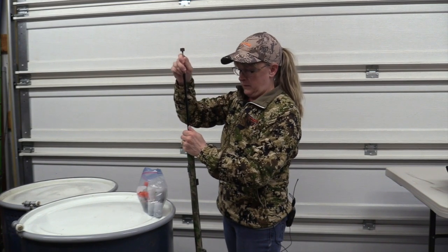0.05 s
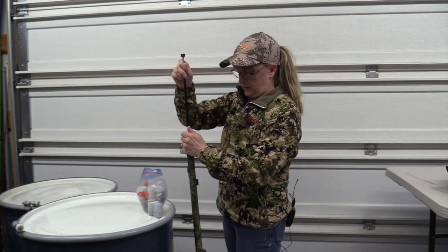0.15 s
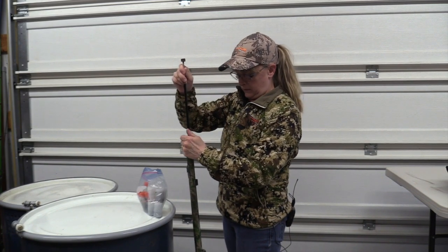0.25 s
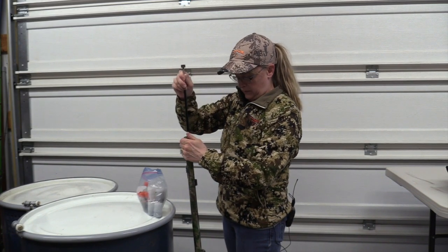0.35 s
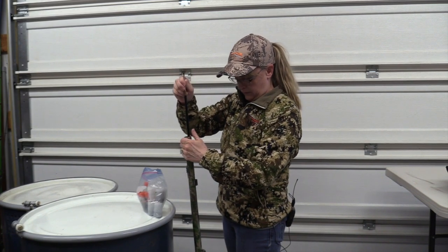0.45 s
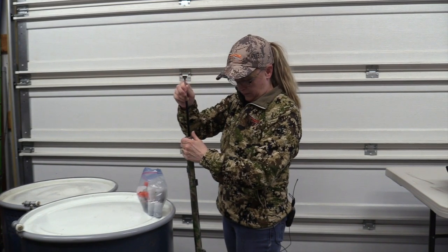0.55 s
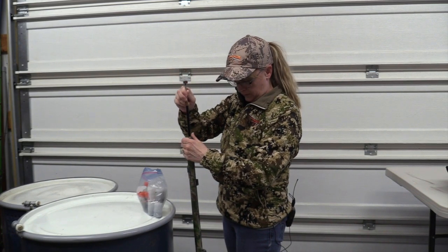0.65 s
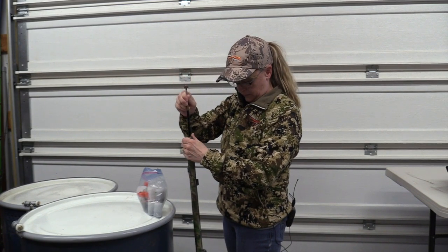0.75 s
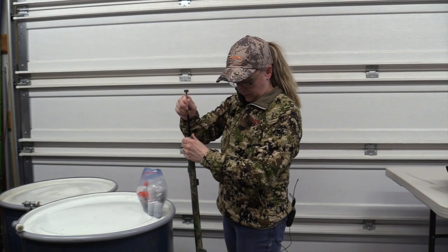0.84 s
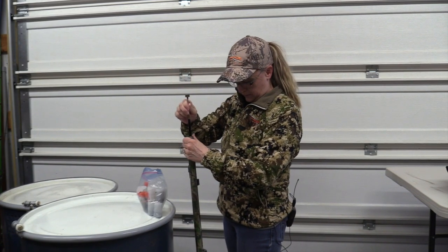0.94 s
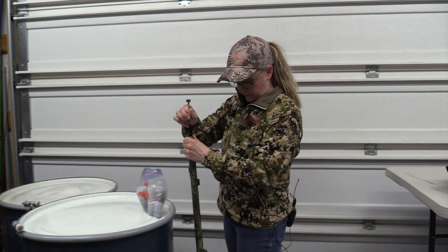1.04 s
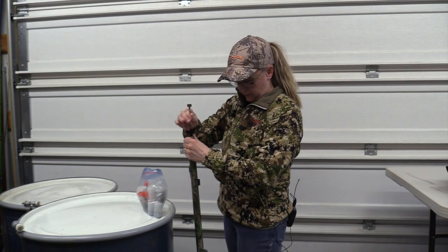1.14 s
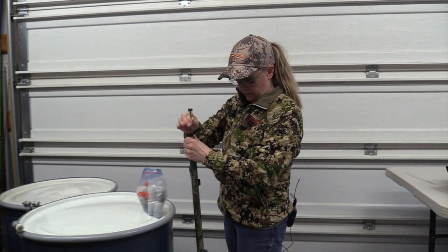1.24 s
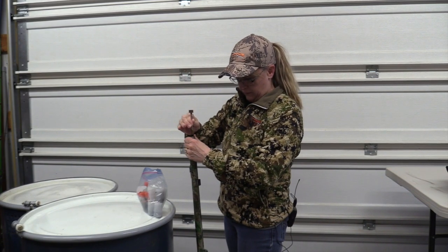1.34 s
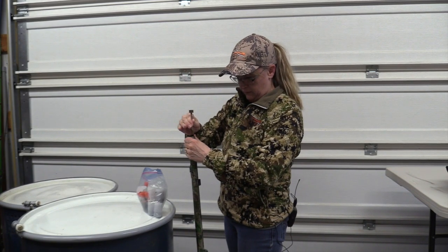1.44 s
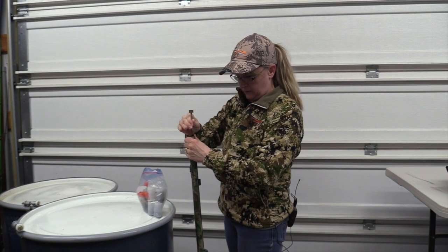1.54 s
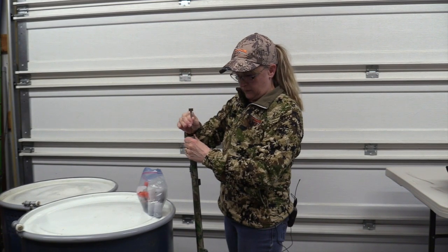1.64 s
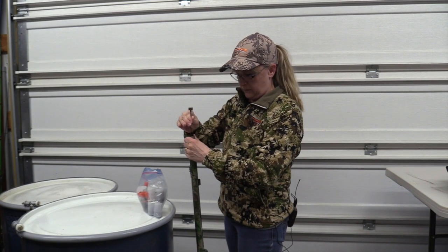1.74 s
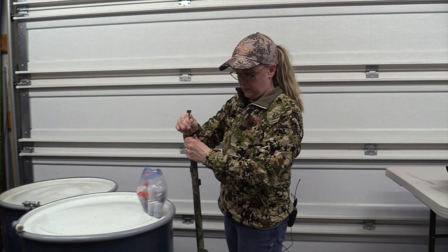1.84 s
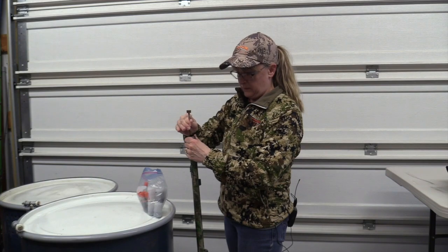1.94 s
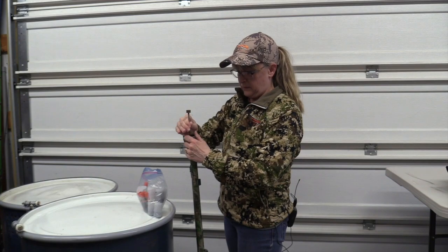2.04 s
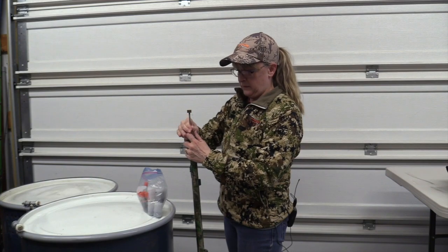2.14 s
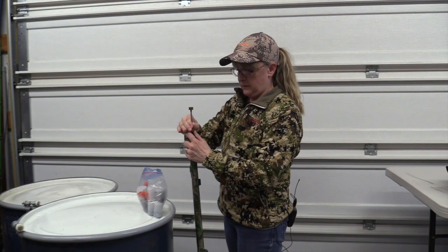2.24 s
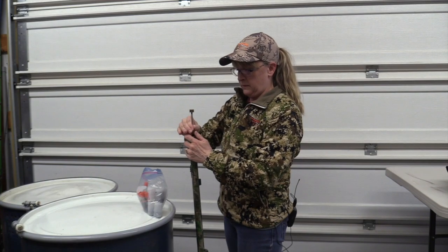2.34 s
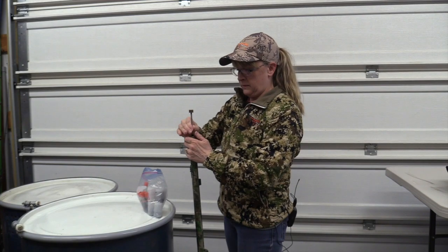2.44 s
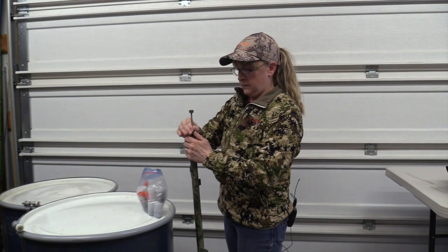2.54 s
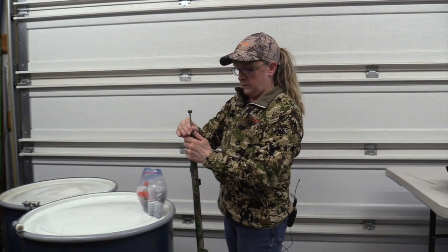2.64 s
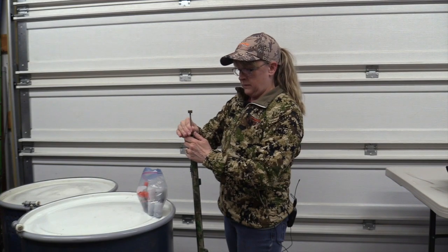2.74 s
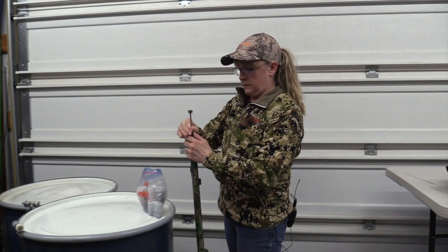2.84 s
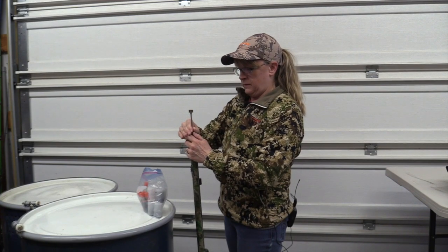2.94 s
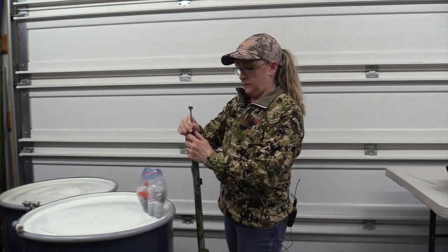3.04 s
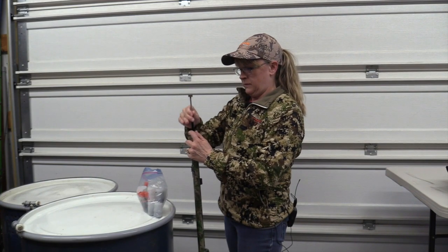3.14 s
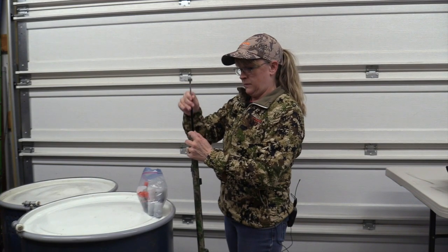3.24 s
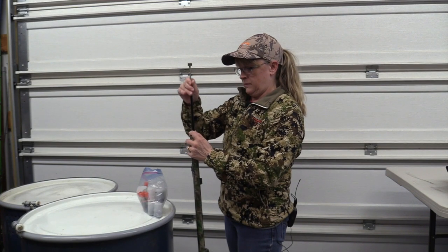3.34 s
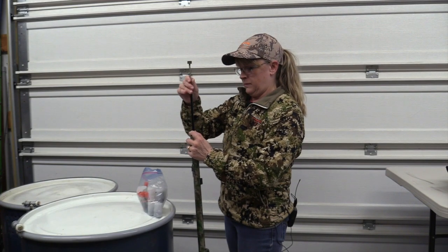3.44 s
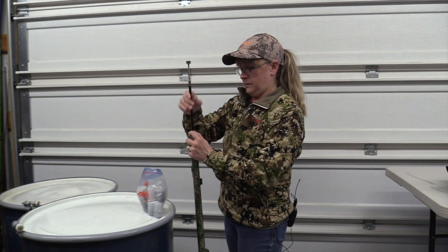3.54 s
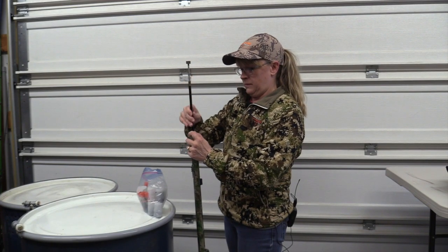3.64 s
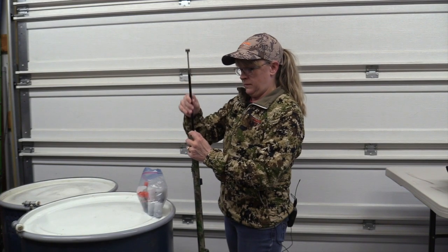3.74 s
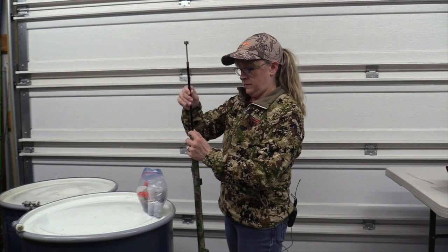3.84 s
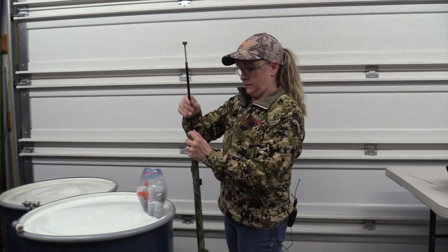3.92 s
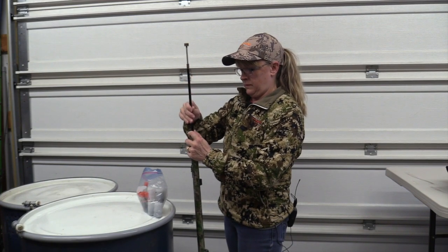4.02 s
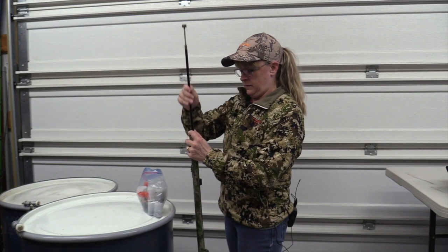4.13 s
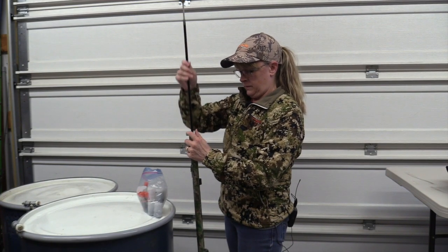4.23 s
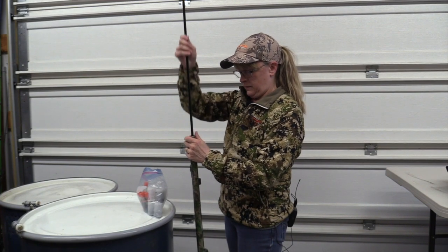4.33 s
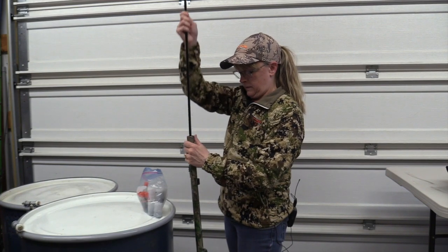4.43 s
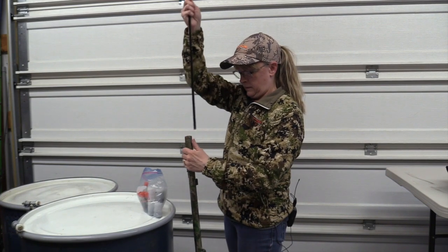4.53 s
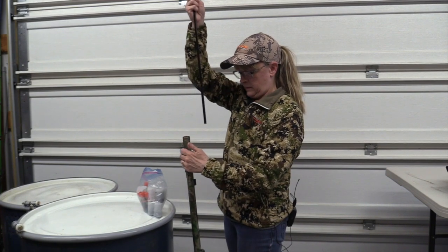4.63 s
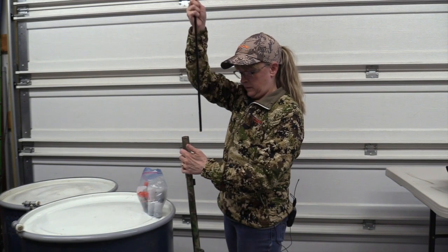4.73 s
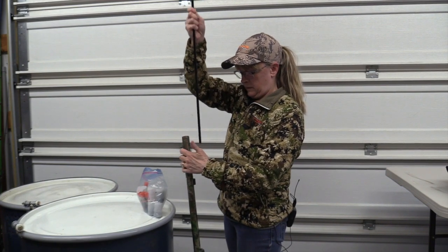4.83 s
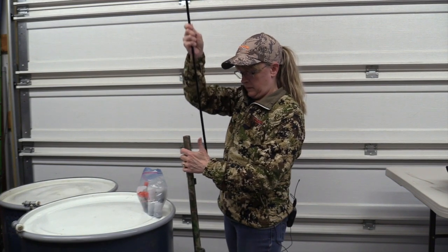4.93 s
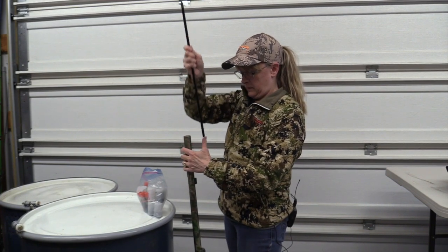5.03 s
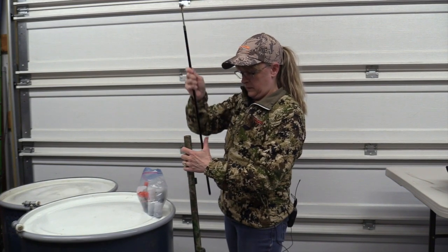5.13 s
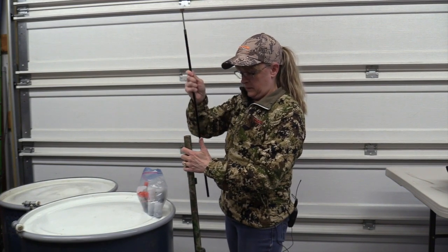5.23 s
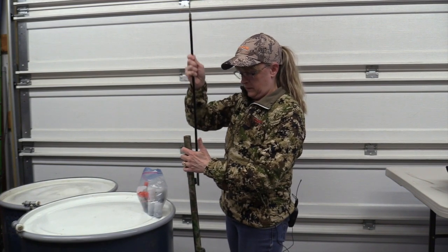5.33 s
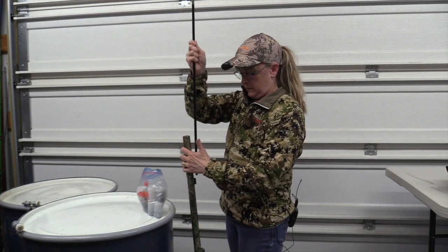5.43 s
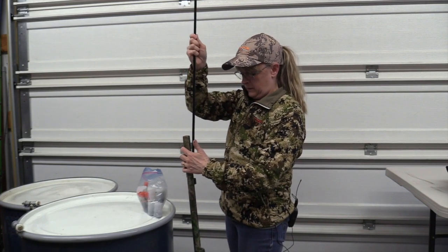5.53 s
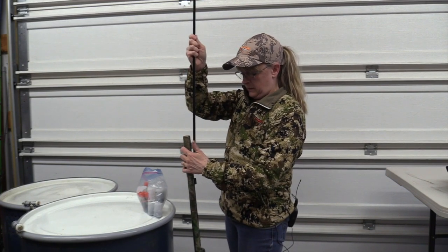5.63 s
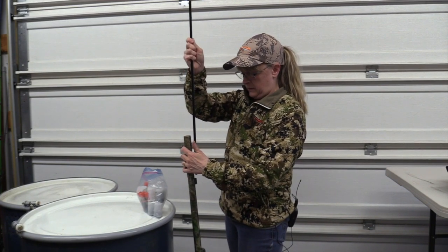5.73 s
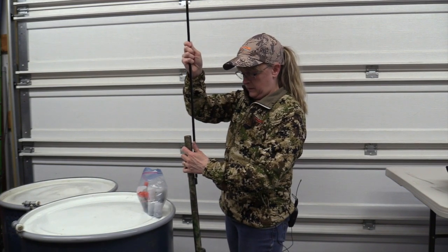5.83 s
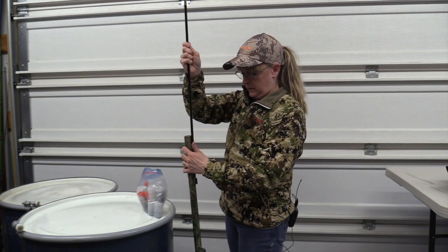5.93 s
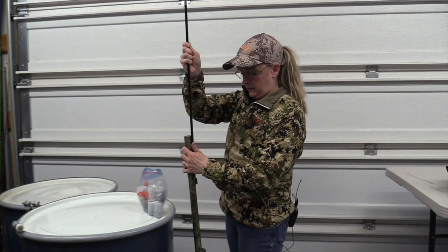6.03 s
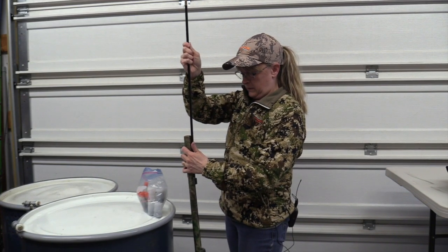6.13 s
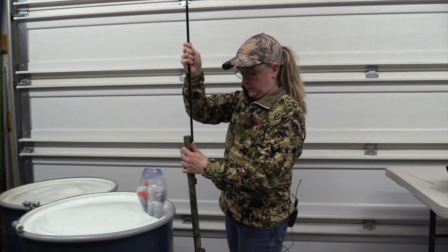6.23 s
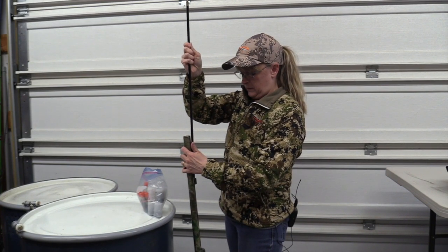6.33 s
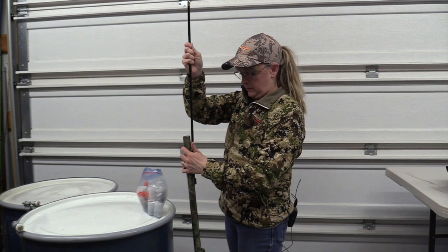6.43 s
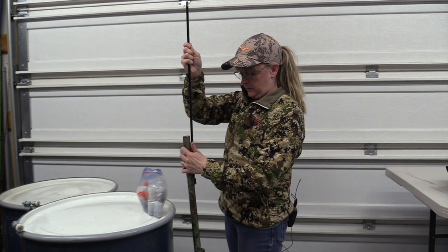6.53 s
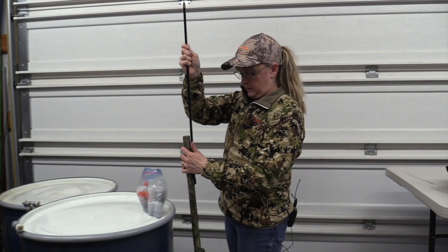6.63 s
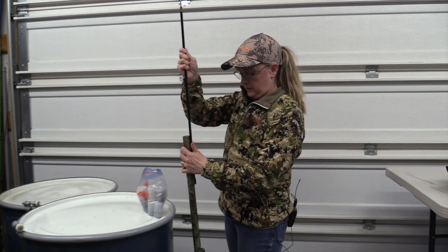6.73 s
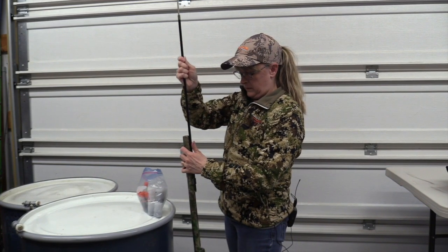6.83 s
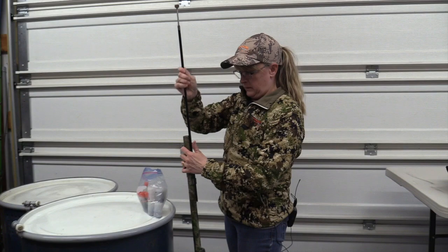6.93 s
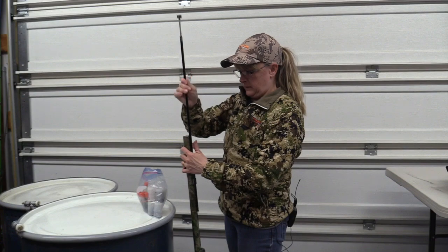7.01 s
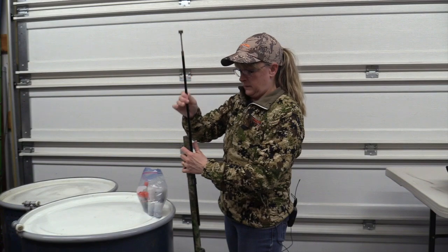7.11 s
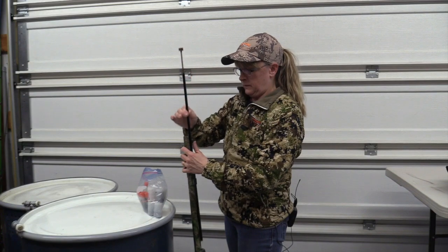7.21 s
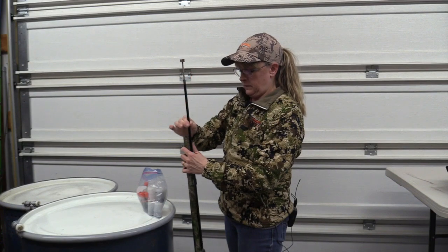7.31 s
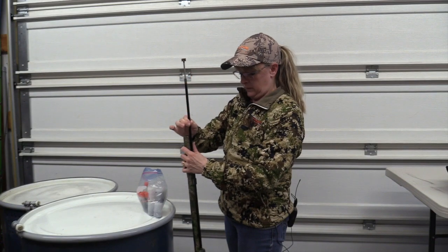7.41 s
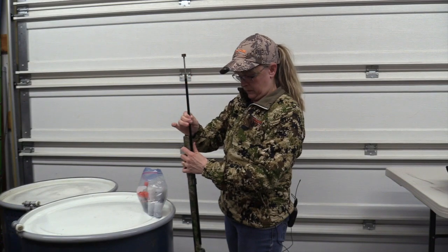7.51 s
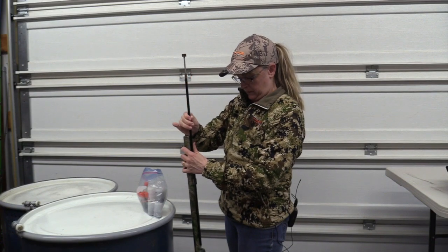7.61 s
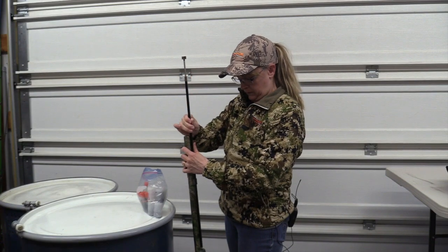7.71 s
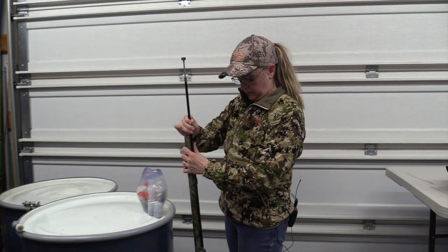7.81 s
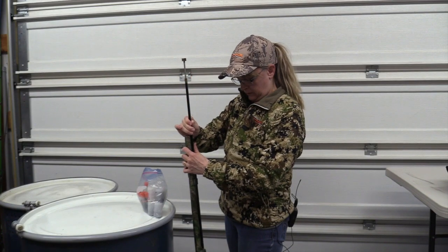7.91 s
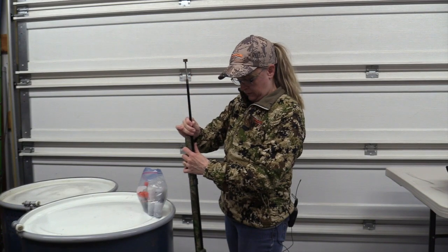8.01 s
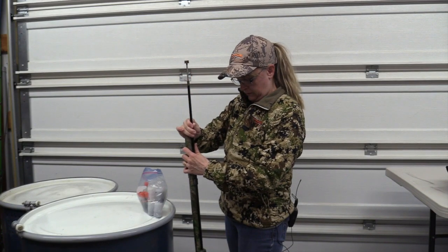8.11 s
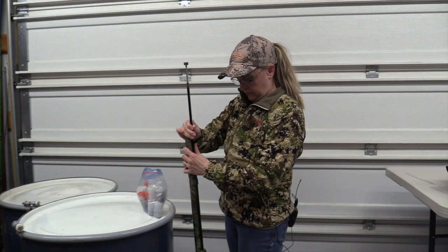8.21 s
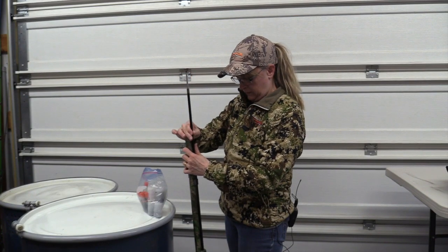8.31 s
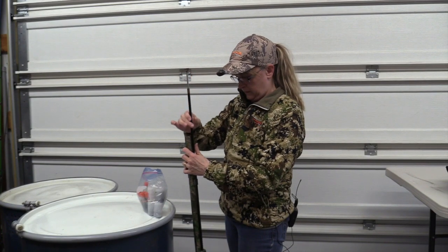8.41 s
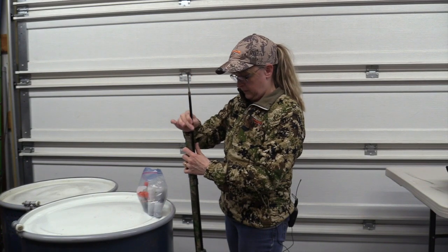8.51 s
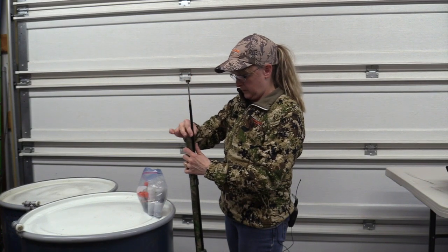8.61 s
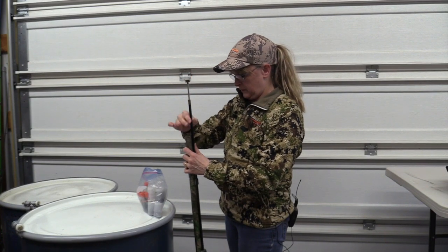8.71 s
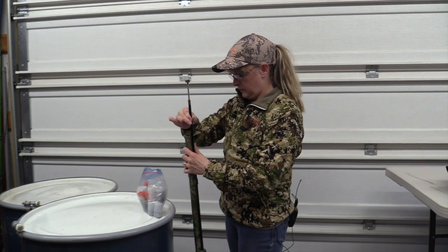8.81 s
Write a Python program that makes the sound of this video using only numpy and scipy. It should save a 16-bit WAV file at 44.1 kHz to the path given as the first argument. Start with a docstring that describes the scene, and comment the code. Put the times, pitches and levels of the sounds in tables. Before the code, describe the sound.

Air hisses with a thin sinking whistle as a rod is pushed down a gun barrel, then stops. Soft knocks follow, then a burst of loud bright metallic clinks and gritty scrapes as the rod is pulled out. After a lull, a double clink, another scraping squeak inward, hollow taps and final clinks. Low garage rumble; one close clip-on microphone with cloth rustle and thumps, another about a metre farther off.

```python
"""In a garage, a ramrod is pushed down a gun barrel, drawn out and fed in again.
Air hisses and faintly whistles on the first push: coloured noise and one sinking tone.
The rod clinks (ringing modes and a crack), scrapes (noise through those modes), squeaks and knocks.
Left is a close clip-on microphone that thumps and clips at hard strikes and hears the sleeves;
right is a microphone about a metre farther off: later, recoloured and without the thumps."""
import sys
import numpy as np
from scipy import signal
from scipy.fft import rfft, irfft, next_fast_len
from scipy.io import wavfile
from scipy.ndimage import uniform_filter1d

SR = 44100
rng = np.random.default_rng(int(sys.argv[2]) if len(sys.argv) > 2 else 0)


def wrap_up_sound(samples):
    """Save the sound to the file named by the first command line argument, as 16-bit audio."""
    columns = np.atleast_2d(samples).T
    # keep every value between -1 and 1, then stretch to whole-number steps
    tamed = np.clip(columns, -1, 1)
    steps = np.round(tamed * 32767).astype(np.int16)
    wavfile.write(sys.argv[1], SR, steps)


N = 390751
T = np.arange(N) / SR
HIT_T = T[:6000]  # time axis of one short blow
FFT_SIZE = next_fast_len(N, real=True)

# The rod strikes the bore. Each row: start in seconds, strength in dB before the mix,
# middle against treble in dB, top against treble in dB.
STRIKES = [(0.0397, -29.5, -3.5, -5), (0.2793, -25, -6, -4.5), (0.608, -33.5, -2, -6), (1.964, -46, -1, 3),
           (3.2224, -16.5, -9.5, -12.5), (3.2298, -14, -19, -3.5), (3.253, -23, -21.5, -3),
           (3.299, -3, -12.5, 0), (3.3185, -16, -11, -19), (3.365, -17.5, -8, 2), (3.3744, -15, -17, 0.5),
           (3.5454, -13, -11, -0.5), (3.8674, -11, -11.5, -1.5), (3.955, -15.5, -12, 0.5),
           (4.116, -0.5, -11, -7.5), (4.1283, -15.5, -18.5, -23), (4.1646, -12, -28, -5.5),
           (4.329, -12, -26, -1.5), (4.343, -18, -13, 1.5), (4.36, -12, -15, -7), (4.4358, -7, -12, -10),
           (4.447, -21.5, -11.5, -17), (4.4684, -30, -8, 6), (4.5248, -3, -9, -2),
           (5.4417, -8.5, -3.5, 2.5), (5.4493, -4.5, -15, -7), (5.9124, -12.5, -4, -3),
           (7.3013, -13.5, -9, -7), (7.3765, -5, -8.5, -11), (7.5895, -31.5, -2, -9),
           (8.5789, -7.5, -11.5, -7.5), (8.5998, -15.5, -26.5, -8), (8.6272, -19.5, -5.5, 2),
           (8.8487, -18.5, -7, -9.5)]
# Bending modes of the rod. Each row: pitch in Hz, relative level in dB,
# 60 dB decay in seconds before the blow's length scales it.
ROD_MODES = [(975, -15, 0.071), (1500, -14, 0.025), (1610, -8.5, 0.0062), (2107, -15.5, 0.067),
             (2936, -6.5, 0.029), (3554, -1.5, 0.048), (5214, -8, 0.074), (5450, -12.5, 0.023),
             (6210, 3, 0.051), (7140, 3.5, 0.045), (8210, -0.5, 0.049), (8710, 5.5, 0.028),
             (9524, 10.5, 0.043), (10640, 1, 0.055), (12050, 4.5, 0.019), (12880, -11.5, 0.018),
             (13870, -23, 0.02), (15270, -27, 0.026)]


def amp(db):
    """Decibels to gain."""
    return 10 ** (np.asarray(db) / 20)


def unit(x):
    """Scales to rms 1."""
    return x / np.sqrt(np.mean(x ** 2) + 1e-20)


def read(points, hz):
    """Joins (Hz, value) points on a log-frequency axis."""
    f, value = np.transpose(points)
    return np.interp(np.log(hz + 1), np.log(f + 1), value)


def level(curve):
    """Gain over time from (seconds, dB) points."""
    return amp(np.interp(T, *np.transpose(curve)))


def add(mix, start, sound):
    """Mixes a sound in at a time in seconds, or at zero if that is negative."""
    part = mix[max(round(start * SR), 0):][:len(sound)]
    part += sound[:len(part)]


def colour(x, spectrum):
    """Filters a sound by a spectrum of (Hz, dB) points."""
    gain = amp(read(spectrum, np.fft.rfftfreq(FFT_SIZE, 1 / SR)))
    return irfft(rfft(x, FFT_SIZE) * gain, FFT_SIZE)[:N]


def noise(spectrum):
    """Steady noise of a given colour, rms 1."""
    return unit(colour(rng.standard_normal(N), spectrum))


def wander(hz):
    """A random line of rms 1 that heads for a new value hz times a second."""
    return unit(np.interp(T * hz, np.arange(N), rng.standard_normal(N)))


def band(x, lo, hi, order=2):
    """Band-pass from lo to hi Hz."""
    edges = np.clip([lo, hi], 10, .49 * SR)
    return signal.sosfilt(signal.butter(order, edges, "band", fs=SR, output="sos"), x)


def registers(x):
    """The middle, the treble and the top of a sound."""
    return band(x, 120, 3600, order=4), band(x, 3900, 8900, order=6), band(x, 9200, 19000, order=6)


def shifting(x, depth_db):
    """Patches of colour, a few hundred Hz wide, come and go in tens of milliseconds."""
    z = signal.stft(x, SR, nperseg=512, noverlap=384)[2]
    patches = uniform_filter1d(rng.standard_normal(z.shape), size=3, axis=0)  # across pitch
    patches = unit(uniform_filter1d(patches, size=14, axis=1))  # along time
    return signal.istft(z * amp(depth_db * patches), SR, nperseg=512, noverlap=384)[1][:N]


def gesture(start, end, rise_s, release_s):
    """A movement gathers speed, holds, and dies away after its end."""
    rise = np.clip((T - start) / max(rise_s, .001), 0, 1)
    return rise * np.exp(-np.maximum(T - end, 0) / max(release_s, .001))


def glide(start, end, first_hz, last_hz, blur, jitter_hz=900):
    """Phase of a rough, gliding tone, and the arch of its level."""
    n = max(round((end - start) * SR), 500)
    rate = np.geomspace(first_hz, last_hz, n) * (1 + blur * wander(jitter_hz)[:n])
    return 2 * np.pi * np.cumsum(rate) / SR, np.hanning(n)


def struck(x):
    """Scales a blow so that its first milliseconds peak near 1."""
    return x / (3 * np.sqrt(np.sum(x[:900] ** 2) / 300))


def squareness(middle, top, middle_share=0.44, top_share=0.663):
    """In dB: a square blow is strong over the whole range, a glancing one only wakes the treble."""
    return middle_share * middle + top_share * top


def rumble(close_db=11, far_db=5):
    """The garage's steady rumble: slowly swelling noise, with its own colour at each microphone."""
    # Each row: time in seconds, level in dB before the microphone's gain.
    swell_points = [(0.0, -51.5), (1.85, -48.5), (2.34, -46), (3.48, -47), (6.07, -48), (6.54, -50),
                    (8.86, -51.5)]
    close_floor = [(20, -13.5), (60, -3), (130, -2), (300, -9.5), (500, -15.5), (1000, -23), (2000, -29.5),
                   (4000, -39.5), (8000, -40.5), (16000, -44.5)]
    # Rumble at the farther microphone. Each row: frequency in Hz, relative level in dB.
    far_floor = [(20, 10.5), (80, -20), (160, 1.5), (280, 5), (500, -2.5), (1000, -8), (2000, -15),
                 (4000, -23.5), (8000, -30), (16000, -33)]
    swell = level(swell_points)
    close = amp(close_db) * swell * noise(close_floor)
    far = amp(far_db) * swell * noise(far_floor)
    return np.array([close, far])


def escaping_air(close_db=-44.5, far_db=-44.0, stop_s=1.34, release_s=0.039):
    """Air leaves the breech until the first push ends: turbulent noise, of shifting colour close up."""
    # Hiss of the breech. Each row: frequency in Hz, relative level in dB.
    air_colour = [(150, -34), (600, -12), (1000, -7), (1600, -6.5), (2200, -6.5), (2700, -4.5), (3300, 1),
                  (4300, -0.5), (5200, -14.5), (8000, -12.5), (10500, -12.5), (13200, -12.5), (14500, -17),
                  (16000, -25)]
    flow = gesture(0, stop_s, 0, release_s)
    close = amp(close_db) * flow * shifting(noise(air_colour), 4.6)
    far = amp(far_db) * flow * noise(air_colour)
    return np.array([close, far])


def sleeves(trim_db=2, rest_db=-64.5, rise_s=0.24, release_s=0.11):
    """Cloth rubs as the arms move: unsteady noise that swells with each movement."""
    # Each row: start in seconds, end in seconds, level in dB before the trims.
    arm_moves = [(0, 0.9, -54.5), (2.195, 2.542, -49.5), (3.2, 4.5, -50.5), (4.814, 5.633, -49.5),
                 (6.998, 7.516, -43), (7.997, 8.86, -57.5)]
    arms = amp(rest_db)
    for start, end, db in arm_moves:
        arms = arms + amp(db - 1.0) * gesture(start, end, rise_s, release_s)
    cloth = noise([(200, -26.5), (900, 0.0), (2200, -4.0), (5000, -9.0), (15000, -21.5)])
    return amp(trim_db) * arms * cloth * amp(2 * wander(25))


def whistle(blur=0.032):
    """One thin, slowly sinking, slightly rough tone of the first push."""
    # One row: start in seconds (negative counts as zero), end in seconds, first pitch in Hz,
    # last pitch in Hz, level in dB before the mix. End minus start is the length.
    sinking_tone = (-0.1, 1.7, 2159, 1787.5, -53.5)
    out = np.zeros(N)
    start, end, first_hz, last_hz, db = sinking_tone
    turns, arch = glide(start, end, first_hz, last_hz, blur)
    add(out, start, amp(db) * arch * np.sin(turns))
    return out


def rod_ring(length):
    """The rod's decaying modes after one contact; random weights stand for the place of contact."""
    hz, db, t60 = np.transpose(ROD_MODES)[:, :, None]
    weight, phase, grip = rng.standard_normal((3, len(ROD_MODES), 1))
    db = db + 2.5 * weight
    hz = hz * (1 + .007 * grip)
    fade = amp(db - 60 * HIT_T / (t60 * max(length, .2)))
    ring = (fade * np.sin(2 * np.pi * (hz * HIT_T + phase))).sum(0)
    return ring / np.linalg.norm(ring)


def clinks(chatter_s=0.0026, crack_t60=0.028, crack_db=-4):
    """A strike is a few milliseconds of crack plus the rod, which rings longer after a glancing blow."""
    # Noise of the crack. Each row: frequency in Hz, relative level in dB.
    crack_colour = [(60, -20.5), (250, -1.5), (600, -1.5), (1500, -7), (4000, -10.5), (7000, 2.5),
                    (11000, 8.5), (14000, -1), (16000, -14)]
    out, cracks, t = np.zeros(N), noise(crack_colour), HIT_T
    attack = 1 - 0.37 * np.exp(-t / 0.00083)
    for s, db, middle, top in STRIKES:
        length = np.clip(0.3 - 0.12 * squareness(middle, top), .3, .9)
        crack_fade = amp(-60 * np.maximum(t - chatter_s, 0) / (crack_t60 * length))
        crack = np.roll(cracks, -round(s * SR))[:len(t)] * crack_fade
        blow = attack * (unit(rod_ring(length)) + amp(crack_db) * unit(crack))
        gains = amp([middle + 3, 2.0, top + 2])
        add(out, s, amp(db) * sum(gain * struck(part) for gain, part in zip(gains, registers(blow))))
    return out


def thumps(growth=1.5, start_hz=260, end_hz=26, sag_s=0.0036, thump_db=3):
    """A square strike throws the close microphone off balance; it swings back ever more slowly."""
    # The hand lets go of the muzzle. One row: time in seconds, level in dB.
    hand_bump = (4.594, -15)
    out, t = np.zeros(N), HIT_T
    fade = (1 - np.exp(-t / .0012)) * np.exp(-t / .0135)
    rate = end_hz + start_hz * np.exp(-t / sag_s)  # Hz, sinking towards end_hz
    swing = -np.sin(2 * np.pi * np.cumsum(rate) / SR) * fade
    for s, db, middle, top in STRIKES:
        add(out, s, amp(growth * db + thump_db + squareness(middle, top)) * swing)
    bump_s, bump_db = hand_bump
    add(out, bump_s, amp(bump_db) * swing * np.exp(-t / 0.023))
    return out


def friction(ring_db=8, width_hz=150, grain_db=4, judder_db=2):
    """Tiny uneven slips feed the rod's modes; the moving contact favours now these, now those."""
    # Noise of the slips. Each row: frequency in Hz, relative level in dB.
    grit_colour = [(100, -35), (500, -25.5), (1000, -0.5), (2500, -2), (4500, -2.5), (6500, 4), (9500, 4),
                   (13000, -12), (15000, -19.5), (16000, -27)]
    slips = noise(grit_colour) * amp(grain_db * wander(900) + judder_db * wander(90))
    hz = np.fft.rfftfreq(FFT_SIZE, 1 / SR)
    modes = 0
    for mode_hz, _, _ in ROD_MODES:
        width = width_hz * np.sqrt(mode_hz / 3000)
        modes = modes + 1 / (1 + (2 * (hz - mode_hz) / width) ** 2)
    boost = amp(ring_db * modes * (hz / 6000) ** 0.86)  # high modes stand out most
    ringing = irfft(rfft(slips, FFT_SIZE) * boost, FFT_SIZE)[:N]
    return shifting(ringing, 3.5)


def scrapes(release_s=0.0053):
    """Each stroke of the sliding rod opens the friction, with the colour of its own contact."""
    # Each row: start in seconds, end in seconds, rise in seconds, treble in dB before the mix,
    # middle against treble in dB, top against treble in dB.
    strokes = [(0.05, 0.132, 0.03, -46, -7, 0), (0.295, 0.429, 0.01, -43, -1, 2),
               (0.79, 1.08, 0.04, -52.5, -3.5, -2.5), (3.087, 3.118, 0.0053, -46.5, 3.5, -16),
               (3.106, 3.159, 0.029, -44, -4, 2.5), (3.224, 3.265, 0.006, -31.5, -7, -3),
               (3.325, 3.357, 0.008, -32.5, -4, -5), (3.37, 3.432, 0.0054, -30.5, -4.5, 3.5),
               (3.724, 3.793, 0.038, -23, -17.5, -6), (3.787, 3.881, 0.01, -32, -9.5, 1),
               (4.025, 4.047, 0.02, -26.5, -9, -10), (4.142, 4.254, 0.045, -24, -14.5, -2),
               (4.255, 4.374, 0.02, -35, -7.5, 1.5), (6.755, 6.923, 0.02, -38.5, -2, -8),
               (6.917, 7.024, 0.01, -44.5, -4.5, 1.5), (7.008, 7.1, 0.04, -36, -9.5, 0),
               (7.098, 7.352, 0.01, -35.5, -5.5, -1.5), (7.103, 7.163, 0.027, -25.5, -13, -9),
               (7.303, 7.332, 0.008, -28, -2.5, -6), (8.269, 8.362, 0.095, -40, -1.5, -8),
               (8.579, 8.606, 0.006, -31, -3, 0), (8.6, 8.657, 0.01, -43, 2.5, 3.5)]
    power = np.zeros((3, N))
    for start, end, rise_s, db, middle, top in strokes:
        gains = amp(db + np.array([middle, 0, top]))
        power += np.outer(gains ** 2, gesture(start, end, rise_s, release_s) ** 2)
    return sum(np.sqrt(p) * unit(part) for p, part in zip(power, registers(friction())))


def squeaks(blur=0.036, judder_db=2.5):
    """Slips of the sliding rod fall into a rough, broken rhythm with a gliding rate and overtones."""
    # Each row: start in seconds, end in seconds, first slip rate in Hz, last slip rate in Hz,
    # level in dB before the mix, brightness in dB per overtone.
    squeals = [(0.29, 0.448, 1239, 1370, -46.5, -7), (0.788, 0.884, 1238, 1310, -43, -5),
               (0.934, 1.08, 1530, 1694, -41, -5), (3.741, 3.886, 2040, 1432, -36, 3),
               (6.811, 6.968, 2300, 1614, -52, 2.5), (7.015, 7.105, 1924, 1306, -34, 2.5)]
    # Each row: multiple of the slip rate, level in dB before the brightness.
    overtones = [(2, -0.5), (3, -7.5), (4, 2.5), (5, -11)]
    out = np.zeros(N)
    for start, end, first_hz, last_hz, db, bright in squeals:
        turns, arch = glide(start, end, first_hz, last_hz, blur)
        tone = 0
        for i, (multiple, over_db) in enumerate(overtones):
            tone = tone + amp(over_db + bright * i) * np.sin(multiple * turns)
        add(out, start, amp(db) * arch * tone)
    return out * amp(judder_db * wander(250))


def knocks(t60=0.061, ring_share=0.18, spread=2.39, tone=0.78):
    """Cushioned contacts: a short burst and a hollow tone at one pitch, with a little of the rod in it."""
    # Light knocks of rod, load and hand. Each row: start in seconds, level in dB before the mix,
    # centre in Hz, treble against middle in dB.
    light_knocks = [(1.347, -33.5, 1920, -8), (1.418, -39.5, 2210, -12), (1.736, -34, 1100, -11),
                    (1.829, -30, 2280, -0.5), (1.844, -31, 1490, -23), (2.252, -39, 1280, -6),
                    (2.263, -21.5, 1100, -3.5), (2.291, -26, 1375, -20), (2.416, -31.5, 1480, -12),
                    (2.768, -33.5, 1006, -9), (4.636, -34.5, 1425, -2), (5.914, -27, 2110, -17),
                    (5.99, -39, 1410, 5), (6.622, -28, 1555, -1), (7.555, -30, 1795, -4),
                    (7.684, -42, 970, -1), (7.706, -34.5, 1490, -2.5), (7.821, -23.5, 1480, -26),
                    (7.831, -20.5, 1080, -34), (7.85, -24, 927, -32), (7.96, -35, 1775, -30),
                    (8.023, -36, 894, -13), (8.135, -34, 1190, -13), (8.159, -33.5, 3070, 3),
                    (8.194, -32, 1015, -30), (8.258, -32, 1094, -18), (8.459, -28.5, 1640, 0.5),
                    (8.614, -25.5, 1006, -15), (8.817, -32.5, 940, 0.5)]
    out, t = np.zeros(N), HIT_T
    for s, db, hz, treble in light_knocks:
        # a hard knock (much treble) is short, a cushioned one lasts up to the full length
        length = np.clip(0.44 - 0.04 * treble, .3, 1)
        fade = (1 - np.exp(-t / 0.0011)) * amp(-60 * t / (t60 * length))
        burst = rng.standard_normal(len(t)) * fade
        body = burst + ring_share * signal.fftconvolve(burst, rod_ring(0.33))[:len(t)]
        thud = unit(band(body, hz / spread, hz * spread * 0.66, order=3))
        thud = thud + tone * unit(fade * np.sin(2 * np.pi * hz * t))
        tick = band(body, 3450, 8150)
        add(out, s, amp(db) * (struck(thud) + amp(treble) * struck(tick)))
    return out


def hollow(hz=650, t60=0.096):
    """One short, woody note of the barrel: a decaying sine with a soft start."""
    # Blows that wake it. Each row: time in seconds, level in dB before the mix.
    barrel_blows = [(5.913, -34), (7.303, -37.5), (7.377, -25), (7.556, -41), (7.826, -35), (8.023, -35)]
    out, t = np.zeros(N), HIT_T
    note = np.sin(2 * np.pi * hz * t) * amp(-60 * t / t60) * (1 - np.exp(-t / 0.0022))
    for s, db in barrel_blows:
        add(out, s, amp(db) * note)
    return out


def garage(x, build_s=0.00057):
    """Sparse reflections of random sign and strength, each pitch range dying at its own rate."""
    # Reverberation of the garage. Each row: frequency in Hz, 60 dB decay in seconds.
    decay = [(150, 0.21), (600, 0.094), (1500, 0.34), (3000, 0.33), (5500, 0.33), (8000, 0.29),
             (15000, 0.16)]
    size = 32768
    reflections = rng.standard_normal(size) * (rng.random(size) < .15)
    reflections = reflections * (1 - np.exp(-(T[:size] / build_s) ** 2))
    hz, t, z = signal.stft(reflections, SR, nperseg=256)
    tail = signal.istft(z * amp(-60 * t / read(decay, hz)[:, None]), SR, nperseg=256)[1]
    return signal.fftconvolve(x, tail / np.linalg.norm(tail))[:N]


def scene():
    """The far microphone hears the rod later, from another side and with more of the room."""
    # Colour of the farther microphone against the close one. Each row: frequency in Hz, gain in dB.
    far_colour = [(200, -10.5), (1000, -4.5), (2200, 4), (4000, 5.5), (8000, -7), (15000, -6.5)]
    # The rod's changing reach towards the farther microphone. Each row: time in seconds, gain in dB.
    rod_exposed = [(0, 0), (3.3, -0.5), (4.0, -3), (4.3, 1), (5.6, 0), (7.3, 0.5), (8.6, 2)]
    hits = clinks()
    taps = knocks() + hollow()
    rubs = scrapes() + squeaks() + whistle()
    # sideways, the barrel radiates more crack and less ring
    aside = unit(clinks(crack_db=5)) * hits.std()

    handling = amp(8.0) * taps + amp(3) * rubs
    close = amp(3.0) * hits + handling + amp(-8.5) * garage(aside + handling) + thumps()

    direct = amp(-32.0) * hits + amp(-1.5) * aside + amp(0.5) * taps + amp(-3.5) * rubs
    room = garage(amp(-5.5) * aside + amp(-2.0) * taps + amp(-5.5) * rubs)
    far = colour(direct + room, far_colour) * level(rod_exposed)
    lag = round(.0022 * SR)  # extra path of the sound, 2.2 ms
    far = np.pad(far, (lag, 0))[:N]

    close = close + sleeves()
    return np.array([close, far]) + rumble() + escaping_air()


def record(dry):
    """Both channels clip at full scale; then a steep low-pass at 16 kHz."""
    low_pass = signal.firwin(255, 16000, window=("kaiser", 8), fs=SR)
    return signal.oaconvolve(np.clip(dry, -1, 1), low_pass[None], "same")


dry = scene()
out = record(dry)
wrap_up_sound(out)
```